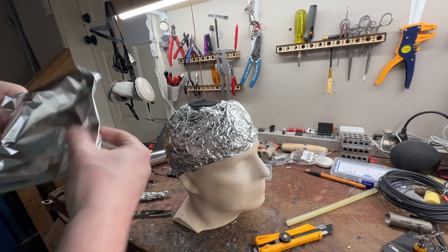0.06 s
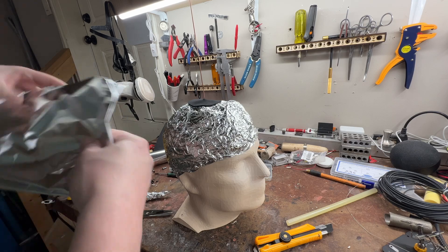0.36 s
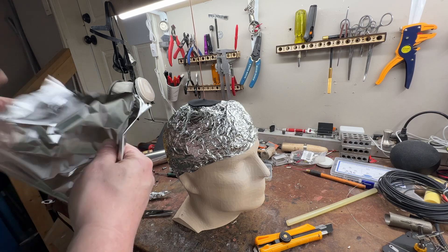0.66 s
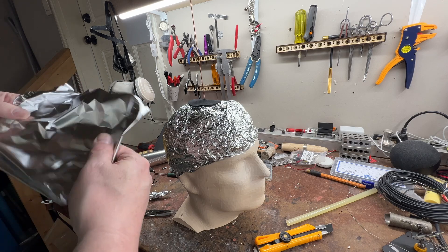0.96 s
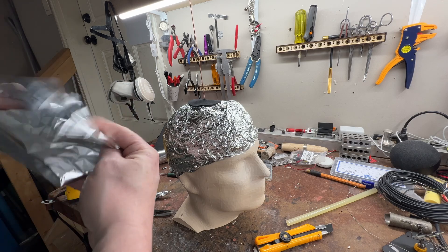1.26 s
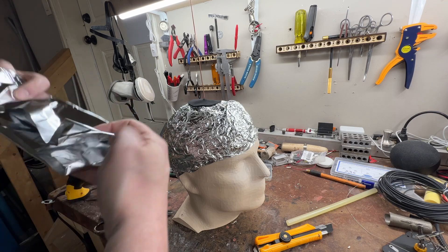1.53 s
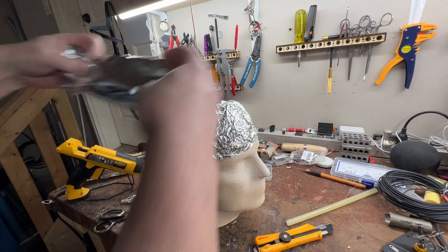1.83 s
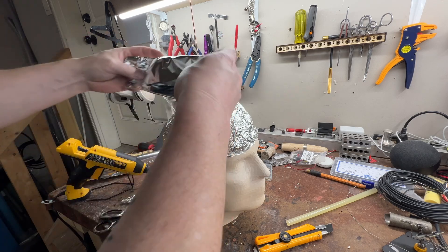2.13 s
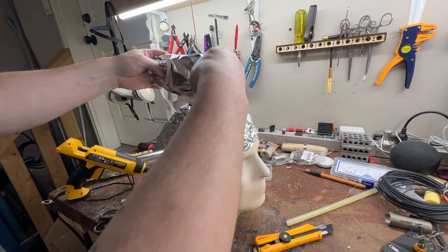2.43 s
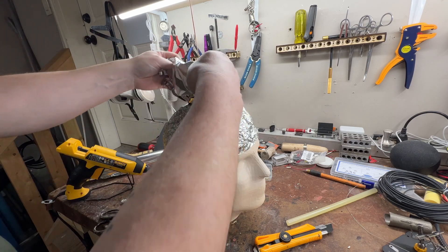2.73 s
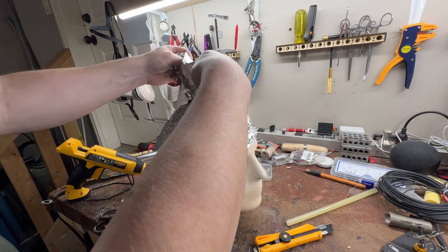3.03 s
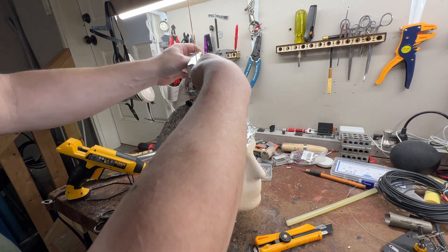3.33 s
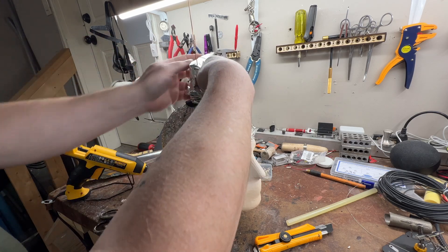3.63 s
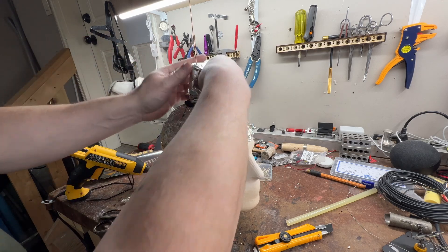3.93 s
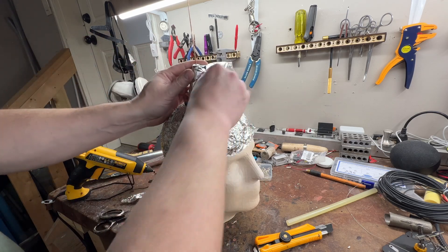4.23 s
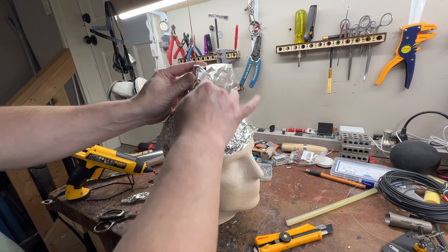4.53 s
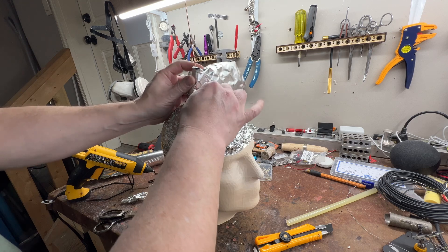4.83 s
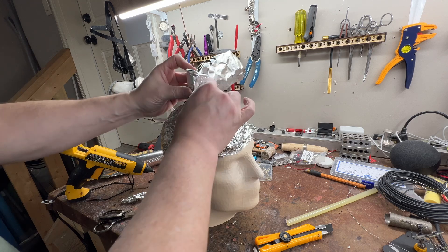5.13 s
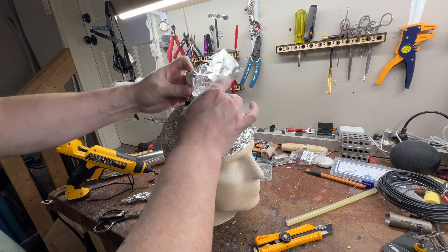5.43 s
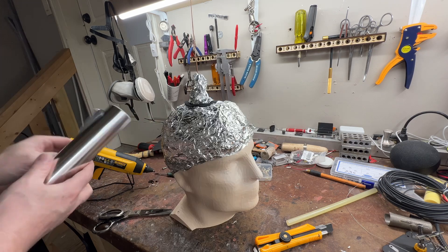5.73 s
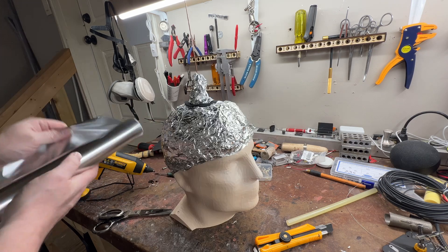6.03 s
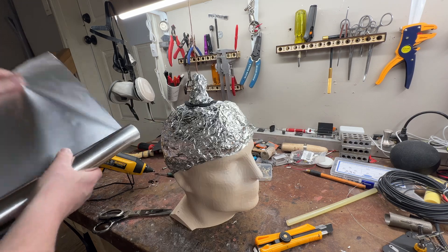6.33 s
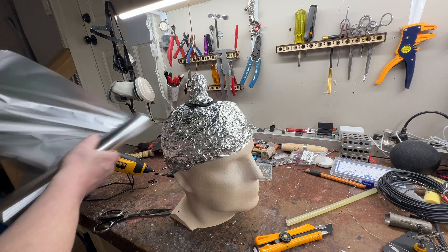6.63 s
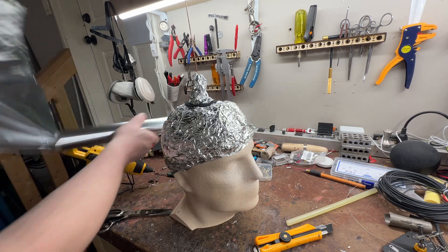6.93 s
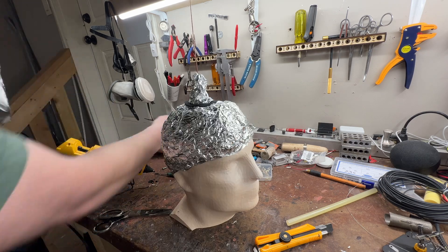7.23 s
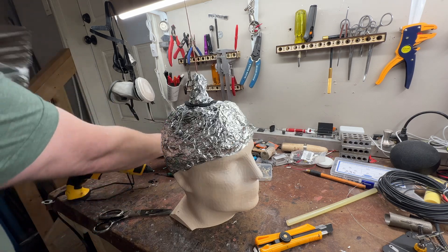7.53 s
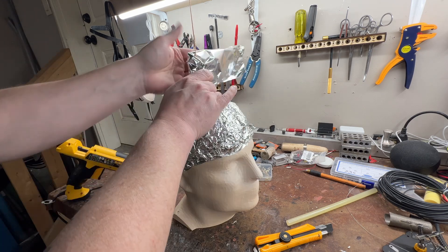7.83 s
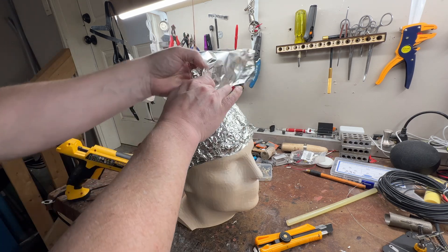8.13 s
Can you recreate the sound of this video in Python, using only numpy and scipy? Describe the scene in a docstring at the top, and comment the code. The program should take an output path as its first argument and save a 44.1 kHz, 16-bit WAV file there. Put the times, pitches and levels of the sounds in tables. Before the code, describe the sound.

Close up in a small workshop, hands crumple aluminium foil in bright, dense showers of crackles with sharp snaps. The crinkling turns quieter, sparser and slightly hollow as the wad is pressed onto a dummy head, with a few soft finger bumps. A fresh sheet then peels off the roll with a loud rattle and a low flutter. After a brief lull, the roll knocks on the bench and brisk crumpling resumes. The sound is stereo.

```python
"""Crumpling aluminium foil

Hands press foil onto a hollow dummy head on a workbench, then pull a fresh sheet off the roll.
Tiny creases give way in dense showers, larger facets buckle with duller pops, the loose sheet flutters.
Fingers bump the head and the roll knocks on the bench. A small workshop answers, heard in stereo
at two close microphone ports."""
import sys
import numpy as np
from scipy import signal
from scipy.fft import rfft, irfft, next_fast_len
from scipy.io import wavfile
from scipy.ndimage import uniform_filter1d

SR = 44100
rng = np.random.default_rng(int(sys.argv[2]) if len(sys.argv) > 2 else 0)


def put_to_file(sound):
    """Save the sound as 16-bit audio at rate SR, in the file named by the first command-line argument."""
    columns = np.atleast_2d(sound).T  # one column per channel
    safe = np.clip(columns, -1, 1)
    whole_steps = np.round(safe * 32767)
    wavfile.write(sys.argv[1], SR, whole_steps.astype(np.int16))


N = 369023
TIME = np.arange(N) / SR
ORDINARY_DB = -53  # crinkling level of an ordinary squeeze; effort is the level above it


def gain_of(db):
    """Decibels to a factor."""
    return 10 ** (np.asarray(db) / 20)


def unit_rms(x):
    """Scales to rms 1."""
    return x / np.sqrt(np.mean(x ** 2) + 1e-20)


def unit_energy(x):
    """Scales to energy 1."""
    return x / (np.linalg.norm(x) + 1e-12)


def at_hz(points, hz):
    """Reads a table on a log-frequency axis."""
    f, value = np.transpose(points)
    return np.interp(np.log(hz + 1), np.log(f + 1), value)


def follow(rows):
    """Each column of a time curve, at every sample."""
    s, *columns = np.transpose(rows)
    return [np.interp(TIME, s, column) for column in columns]


def gated_gains(rows):
    """Each dB column of a time curve as a factor, zero outside the curve."""
    return [gain_of(db) * (TIME >= rows[0][0]) * (TIME <= rows[-1][0]) for db in follow(rows)]


def add(mix, s, sound):
    """Mixes a sound in at time s."""
    part = mix[max(round(s * SR), 0):][:len(sound)]
    part += sound[:len(part)]


def colour(spectrum, size=4096):
    """Minimum-phase impulse response of a spectrum; energy 1."""
    log_gain = np.log(gain_of(at_hz(spectrum, abs(np.fft.fftfreq(size, 1 / SR)))))
    response = np.exp(np.conj(signal.hilbert(log_gain)))
    return unit_energy(np.fft.ifft(response).real[:size // 2])


def noise(spectrum):
    """Steady coloured noise; rms 1."""
    return unit_rms(signal.oaconvolve(rng.standard_normal(N), colour(spectrum))[:N])


def buckle(body, ring_s, uneven_db, rise_s, tick=0.85, size=2048):
    """One snap: a tick, then bending waves scatter through a facet with its own resonances."""
    t = np.arange(size) / SR
    scatter = rng.standard_normal(size) * np.exp(-t / ring_s) * (1 - np.exp(-t / rise_s))
    wave = unit_energy(scatter) + tick * rng.choice([-1, 1]) * (t == 0)
    hz = np.geomspace(200, 16000, 30)
    resonances = colour(np.c_[hz, uneven_db * rng.standard_normal(len(hz))], size=512)
    return unit_energy(signal.fftconvolve(signal.fftconvolve(wave, resonances), body)[:size])


def shower(spectrum, per_s, spread_db, ring_s, uneven_db, steady_s, tick=0.85, facets=48):
    """Random snaps on many facets, most small and a few large; rms near 1."""
    chance, size_draw, facet = rng.random(N), rng.exponential(1, N), rng.integers(0, facets, N)
    body, out = colour(spectrum), np.zeros(N)
    rings = [buckle(body, ring_s, uneven_db, rise_s=0.00088, tick=tick) for _ in range(facets)]
    onsets = np.flatnonzero(chance < per_s / SR)
    sizes = gain_of(spread_db * np.minimum(size_draw[onsets], 4.5))
    for i, size in zip(onsets, sizes):
        add(out, i / SR, size * rings[facet[i]])
    # the hand feeds energy steadily, however the creases share it
    width = int(steady_s * SR)
    power = uniform_filter1d(uniform_filter1d(out ** 2, width), width)
    return out / np.sqrt(abs(power) + 1e-3 * np.median(power) + 1e-12)


# room decay: f/Hz, t60/s
ROOM_T60 = [(150, 0.24), (1000, 0.31), (4000, 0.67), (9000, 0.21), (15000, 0.46)]

def workshop(x, wet_db, wall_db, wall_s):
    """A small cluttered room adds a scattered wall echo and a short diffuse tail."""
    t = np.arange(SR // 2) / SR
    tail_noise, wall_noise = rng.standard_normal((2, len(t)))
    hz, age_s, bins = signal.stft(tail_noise * (1 - np.exp(-t / 0.0012)), SR, nperseg=256)
    decay = gain_of(-60 * age_s / at_hz(ROOM_T60, hz)[:, None])
    tail = signal.istft(bins * decay, SR, nperseg=256)[1][:len(t)]
    wall = wall_noise * (t > wall_s) * np.exp(-abs(t - wall_s) / 0.0025)
    response = gain_of(wet_db) * unit_energy(tail) + gain_of(wall_db) * unit_energy(wall)
    return x + signal.oaconvolve(x, response)[:N]


# phase between ports: f/Hz, left lead/rad
PORT_PHASE = [(60, 0), (250, -.3), (500, -.8), (900, -.8), (1600, 0), (2400, 0), (3100, -.65), (5400, -.45),
              (6600, 0), (7600, -.7), (8400, -.75), (9200, 1.1), (10550, 3.1), (11850, 6.3), (12400, 6.3),
              (13900, 9.4), (15250, 12.6)]
# balance: f/Hz, left minus right/dB
PORT_BALANCE = [(100, 1), (200, -4), (400, -2), (1300, -2.5), (2400, 0)]
# antiphase scatter: f/Hz, level/dB
PORT_SCATTER = [(60, -19), (250, -10), (620, -6), (1400, -12), (5000, -17), (14000, -18)]

def ports(x):
    """Two close ports hear nearly the same sound, apart from phase, balance and a little scatter."""
    size = next_fast_len(N + SR // 4)
    hz, t = np.fft.rfftfreq(size, 1 / SR), np.arange(SR // 8) / SR
    burst = unit_energy(rng.standard_normal(len(t)) * np.exp(-t / 0.018))
    scatter = rfft(burst, size) * gain_of(at_hz(PORT_SCATTER, hz))
    lean = gain_of(at_hz(PORT_BALANCE, hz) / 2) * np.exp(0.5j * at_hz(PORT_PHASE, hz))
    left_right = np.array([(1 + scatter) * lean, (1 - scatter) / lean])
    return irfft(rfft(x, size) * left_right, size)[:, :N]


# room noise spectrum: f/Hz, level/dB
ROOM_AIR = [(20, -45), (40, -9), (65, 7.5), (180, -5), (290, 15.5), (450, -18), (800, -37), (1500, -26),
            (6000, -39), (11000, -62)]

def still_air():
    """Faint low room noise."""
    return gain_of(-75.5) * noise(ROOM_AIR)


# rush spectrum: f/Hz, level/dB
RUSH = [(18, -17), (60, 5.5), (110, -9), (200, -5.5), (330, -6.5), (580, -7), (720, -16), (900, -22.5),
        (3000, -28.5)]

def rush(stop_s=0.202):
    """A dull low rush at the start that stops short."""
    return gain_of(-56.5) * noise(RUSH) * np.clip((stop_s - TIME) / 0.014, 0, 1)


# roll modes: f/Hz, relative level/dB, t60/s
ROLL_MODES = [(296, -6, .11), (452, -1.5, 0.11), (790, -8, .04), (1060, -4, 0.037), (1380, -8, .03)]

def roll_knock(at_s=7.5425):
    """The roll is set down on the bench and rings briefly."""
    out, t = np.zeros(N), np.arange(SR // 5) / SR
    modes = [gain_of(db - 60 * t / t60) * np.sin(2 * np.pi * hz * t) for hz, db, t60 in ROLL_MODES]
    add(out, at_s, sum(modes))
    return gain_of(-48) * out


# spectra of the flapping sheet and the air it pushes: f/Hz, level/dB
FLUTTER = [(60, -25), (150, -10.5), (240, 5.5), (350, 1.5), (460, -2), (560, -8), (720, -12.5),
           (1100, -16.5), (2500, -27)]
AIR_PUSH = [(20, -30), (38, -20), (58, 3), (100, 5), (140, 0.5), (250, -18), (600, -74)]
# arm swing, added to flutter and push: t/s, gain/dB
ARM_SWING = [(0, -3), (2.6, -2.5), (3.07, 4.5), (3.8, 0), (5.9, 1), (7.45, -6), (7.7, 7), (8.37, 6)]
# pulled sheet billowing: t/s, flutter level/dB, push level/dB
BILLOW = [(6.44, -77, -84), (6.47, -65.5, -75), (6.7, -39, -50), (6.748, -52, -67), (6.828, -44.5, -44.5),
          (6.874, -75, -63), (6.944, -60, -66), (7.11, -89, -83)]

def loose_sheet(work_db):
    """The sheet flaps in soft low beats and pushes air, more with effort and most when pulled."""
    effort_db = work_db - ORDINARY_DB
    swing_db = follow(ARM_SWING)[0]
    billow, gust = gated_gains(BILLOW)
    flaps = shower(FLUTTER, per_s=240, spread_db=4, ring_s=0.0033, uneven_db=5.5, steady_s=0.056,
                   tick=0.32)
    flutter_gain = np.hypot(gain_of(-69 + 0.54 * effort_db + swing_db), billow)
    push_gain = np.hypot(gain_of(-70 + 0.14 * effort_db + swing_db), gust)
    return flaps * flutter_gain + noise(AIR_PUSH) * push_gain


# fingers and roll on head and bench: t/s, relative level/dB, f/Hz
BUMPS = [(1.949, -39.5, 327), (2.137, -48.5, 237), (2.665, -47, 105), (3.038, -39.5, 102),
         (3.058, -43, 102), (3.434, -37, 337), (3.719, -53.5, 66.7), (5.507, -43, 353), (6.468, -43, 250),
         (6.818, -42, 75.4)]

def bumps(rise_s=0.0014, decay_cycles=2.37):
    """A soft touch swells and dies within a few cycles as a dull, hollow thud."""
    out, t = np.zeros(N), np.arange(SR // 5) / SR
    for s, db, hz in BUMPS:
        rub = unit_rms(signal.fftconvolve(rng.standard_normal(len(t)), colour(FLUTTER), "same"))
        envelope = (1 - np.exp(-t / rise_s)) * np.exp(-t * hz / decay_cycles)
        thud = (np.sin(2 * np.pi * hz * t) + 0.41 * rub) * envelope
        add(out, s, gain_of(db - 3.5) * thud)
    return out


# peel envelope: t/s, level/dB
PEEL_LEVEL = [(6.52, -68), (6.58, -48.5), (6.68, -38), (6.75, -50.5), (6.82, -53), (6.9, -88)]
# peel spectrum: f/Hz, level/dB
PEEL_RATTLE = [(100, -9.5), (550, -0.5), (800, -9.5), (1300, 2.5), (2600, -18), (9000, -48)]

def peeling():
    """The sheet sticks and slips off the roll in a quick, papery rattle."""
    slips = shower(PEEL_RATTLE, per_s=1000, spread_db=3.5, ring_s=0.0024, uneven_db=5, steady_s=0.061,
                   facets=16)
    return slips * gated_gains(PEEL_LEVEL)[0]


# crinkling per squeeze: t/s, rise/s, hold/s, level/dB
SQUEEZES = [(0, 0.016, 0.001, -47.5), (0.147, 0.065, 0.043, -53.0), (0.25, 0.035, 0.051, -43.5),
            (0.447, 0.0075, 0.002, -52), (0.504, 0.0054, 0.097, -49), (0.542, 0.027, 0.065, -44),
            (0.679, 0.015, 0.013, -50.5), (0.743, 0.021, 0.051, -52.5), (0.84, 0.037, 0.029, -46.5),
            (0.938, 0.082, 0.326, -43), (1.361, 0.006, 0.24, -49.5), (1.665, 0.0037, 0.0088, -49.0),
            (1.712, 0.012, 0.18, -46.0), (1.996, 0.0068, 0.23, -51.5), (2.321, 0.027, 0.018, -54.5),
            (2.418, 0.017, 0.12, -54.5), (2.626, 0.09, 0.042, -58.0), (2.867, 0.043, 0.017, -61),
            (3.001, 0.012, 0.27, -56.5), (3.313, 0.028, 0.17, -56), (3.557, 0.014, 0.077, -51.0),
            (3.745, 0.0068, 0.22, -56.5), (4.009, 0.0098, 0.069, -59.5), (4.142, 0.009, 0.13, -62),
            (4.367, 0.012, 0.043, -58.5), (4.551, 0.0048, 0.33, -59), (4.975, 0.055, 0.076, -60.5),
            (5.129, 0.004, 0.27, -59), (5.4, 0.027, 0.248, -55.0), (5.653, 0.053, 0.045, -47.5),
            (5.89, 0.0072, 0.048, -51.5), (5.953, 0.015, 0.1, -39.5), (6.116, 0.042, 0.099, -46.0),
            (6.266, 0.03, 0.096, -42), (7.536, 0.11, 0.086, -43), (7.782, 0.029, 0.027, -42.5),
            (7.882, 0.0083, 0.02, -42), (7.918, 0.048, 0.072, -46.5), (8.097, 0.042, 0.045, -42.5),
            (8.22, 0.0099, 0.12, -42.5)]
# crinkling as a fresh sheet is pulled and sinks to rest: t/s, relative level/dB
PULL = [(6.44, -54), (6.478, -49.5), (6.56, -32), (6.614, -37), (6.634, -29), (6.698, -30), (6.724, -34.5),
        (6.818, -30), (6.866, -36.5), (6.972, -38), (7.098, -52.5), (7.104, -48.5), (7.378, -57.5),
        (7.52, -79.5)]

def handwork(held_db=-66, pull_gain_db=1, release_s=0.037):
    """Crinkling level in dB: held foil ticks faintly, squeezes build and settle, the pull joins in."""
    pull = gain_of(pull_gain_db) * gated_gains(PULL)[0]
    power = gain_of(held_db) ** 2 + pull ** 2
    for start_s, rise_s, hold_s, db in SQUEEZES:
        age_s = TIME - start_s
        build = np.clip(age_s / rise_s, 0, 1)
        settle = np.exp(-np.clip(age_s - rise_s - hold_s, 0, 1) / release_s)
        power += (gain_of(db) * build * settle) ** 2
    return 10 * np.log10(power)


# foil state: t/s, fold (0 loose sheet, 1 hollow wad)
FOLD = [(0, 0.051), (2.1, 0.31), (2.9, 0.6), (4.4, 0.75), (5.3, 0.45), (5.8, 0.35), (6.5, 0.033),
        (7.45, 0.05), (7.62, 0.52), (8.37, 0.42)]
# spectra of a fine crease, a loose facet and a facet of the wad: f/Hz, level/dB
CREASE = [(400, -35.5), (1000, -33.5), (1800, -10), (3000, -4.5), (4700, 0.5), (6000, 2), (7000, 1),
          (8200, 1.5), (9200, -4.5), (10200, -10.5), (11600, -14.5), (13000, -21), (15800, -26.5)]
LOOSE_FACET = [(250, -22.5), (500, -4.5), (850, -19.5), (1200, -8), (1700, -4.5), (2200, -0.5), (2700, 0),
               (3400, -2.5), (6000, -13.5), (12000, -60)]
WAD_FACET = [(250, -19), (600, -18), (1000, -11.5), (1400, -7), (1750, -1), (2050, -0.5), (2450, -10.5),
             (3400, -9.5), (6000, -19), (12000, -40)]

def crumpling(work_db):
    """Harder work breaks more creases per second; a stiff wad ticks sparsely and rings hollow."""
    fold = follow(FOLD)[0]
    effort_db = work_db - ORDINARY_DB
    pace = gain_of(0.45 * effort_db - 7 * fold)
    creases = shower(CREASE, 1300 * pace, spread_db=4, ring_s=0.0055, uneven_db=3.5, steady_s=0.052)
    # the hiss above 10 kHz rises with loud crinkling and fades in lulls
    treble = signal.oaconvolve(creases, signal.firwin(31, 10000, pass_zero=False, fs=SR), "same")
    creases += treble * (gain_of(0.3 * effort_db - 0.5) - 1)
    loose = shower(LOOSE_FACET, 550 * pace, spread_db=3, ring_s=0.0031, uneven_db=4, steady_s=0.032,
                   tick=0.72)
    hollow = shower(WAD_FACET, 480 * pace, spread_db=2, ring_s=0.0049, uneven_db=4.5, steady_s=0.05,
                    tick=0.69)
    facets = loose * np.sqrt(1 - fold) + hollow * np.sqrt(fold)
    facet_gain_db = -10 + 11 * fold - 0.18 * effort_db
    return creases * gain_of(work_db - 1) + facets * gain_of(work_db + facet_gain_db)


# single loud snaps: t/s, relative crack level/dB, relative pop level/dB
SNAPS = [(0.087, -39, -76), (0.5106, -31.5, -55), (0.6376, -42, -65), (0.6734, -29.5, -72),
         (0.8668, -32.5, -64), (1.0435, -27, -50), (1.4615, -32, -60), (1.5449, -28.5, -41.5),
         (1.613, -28, -50), (1.879, -52, -62), (2.0874, -34.5, -50), (2.119, -41, -52), (2.603, -41, -64),
         (2.8365, -47, -41), (2.8405, -35, -43.5), (2.858, -43, -47), (3.3773, -35.5, -47),
         (3.436, -39, -36.5), (3.6018, -31.5, -53), (3.8665, -35, -50), (4.0264, -45, -53.5),
         (4.1613, -41, -43), (4.2347, -40.5, -62), (4.3777, -60, -52), (4.6385, -39, -55),
         (4.796, -47, -64), (5.277, -55, -48.5), (5.434, -43, -54), (5.5106, -34, -44), (5.588, -38.5, -59),
         (5.964, -27.5, -59), (6.0369, -25.5, -40.5), (6.1537, -35, -57), (6.34, -24, -66),
         (6.6887, -22, -30), (6.767, -19, -40), (6.811, -17.5, -48), (7.5995, -40, -51), (7.665, -30, -42),
         (7.8019, -53, -40), (7.884, -36, -41), (7.9123, -28, -47), (8.227, -37, -46), (8.251, -28, -37),
         (8.3153, -49, -42), (8.3451, -32, -46)]
# ringing facets: t/s, relative level/dB, f/Hz
PINGS = [(0.6379, -32, 3620), (0.6754, -34, 2600), (3.8691, -31.5, 2070), (4.8389, -40, 1680)]

def snaps():
    """A long crease lets go at once: a bright crack and the pop of the next facet; a few ring on."""
    out, t = np.zeros(N), np.arange(SR // 10) / SR
    crease, loose, hollow = colour(CREASE), colour(LOOSE_FACET), colour(WAD_FACET)
    fold = follow(FOLD)[0]
    for s, crack_db, pop_db in SNAPS:
        run_s = 0.0054 * gain_of(0.25 * (crack_db + 45))  # a louder crease runs longer
        crack = buckle(crease, run_s, uneven_db=4, rise_s=0.0015)
        facet = hollow if fold[round(s * SR)] > 0.5 else loose
        pop = buckle(facet, ring_s=0.0046, uneven_db=2, rise_s=0.0008)
        add(out, s, gain_of(crack_db + 13.5) * crack + gain_of(pop_db + 24.5) * pop)
    for s, db, hz in PINGS:
        add(out, s, gain_of(db - 6.5) * np.sin(2 * np.pi * hz * t) * np.exp(-t / 0.0058))
    return out


def scene():
    """Bright foil and low handling sounds in the workshop, in stereo."""
    work_db = handwork()
    foil = crumpling(work_db) + snaps() + peeling()
    foil = workshop(foil, wet_db=-13.5, wall_db=-18.5, wall_s=0.016)
    low = loose_sheet(work_db) + bumps() + roll_knock()
    low = workshop(low, wet_db=-5, wall_db=-14.5, wall_s=0.019)
    # a light sheet and a small head radiate almost no deep bass
    low = signal.sosfilt(signal.butter(4, 48, "highpass", fs=SR, output="sos"), low)
    return ports(foil + low + rush() + still_air())


def record(dry, cutoff_hz=15900):
    """Steep low-pass on both channels."""
    lowpass = signal.firwin(511, cutoff_hz, window=("kaiser", 9), fs=SR)
    return signal.oaconvolve(dry, lowpass[None], "same")


dry = scene()
out = record(dry)
put_to_file(out)
```